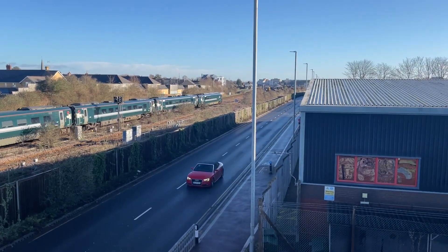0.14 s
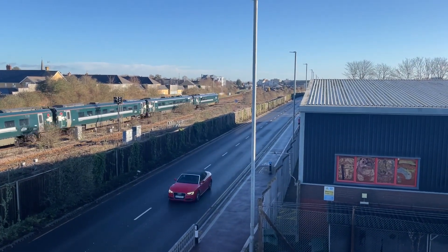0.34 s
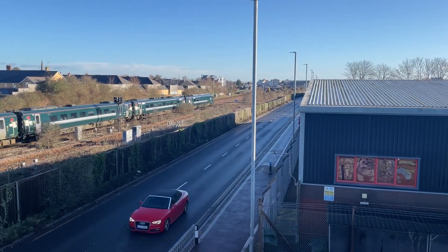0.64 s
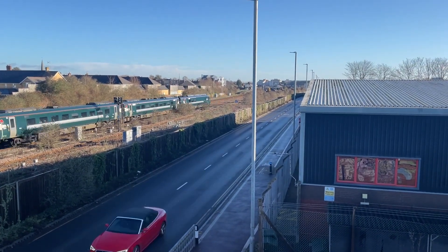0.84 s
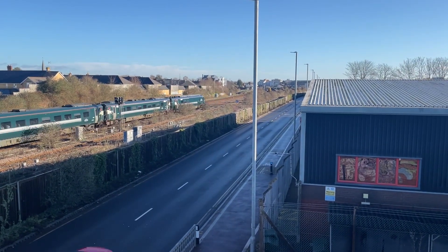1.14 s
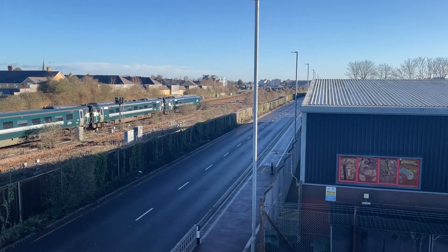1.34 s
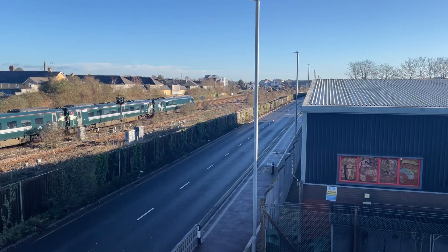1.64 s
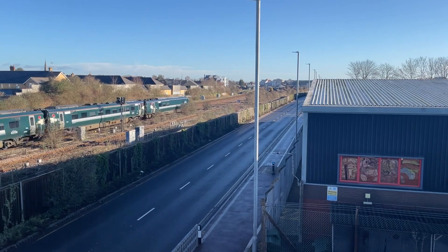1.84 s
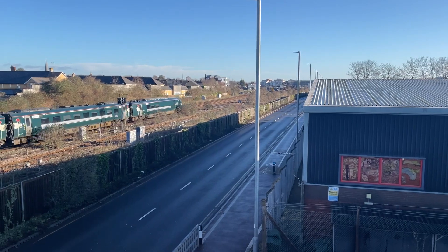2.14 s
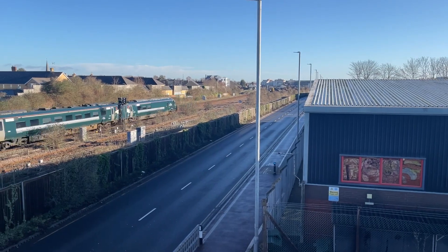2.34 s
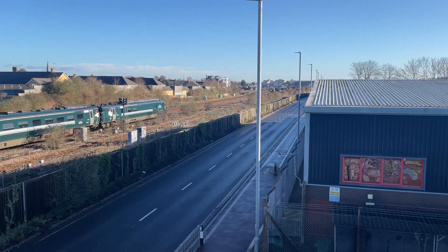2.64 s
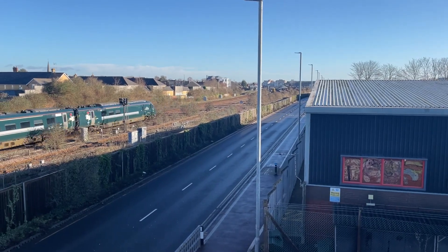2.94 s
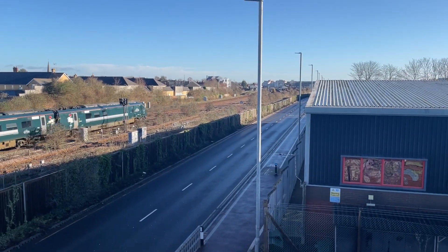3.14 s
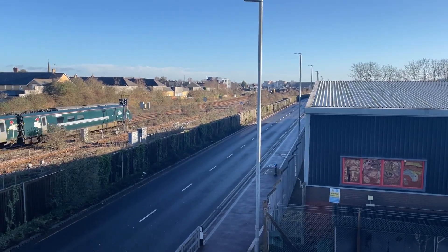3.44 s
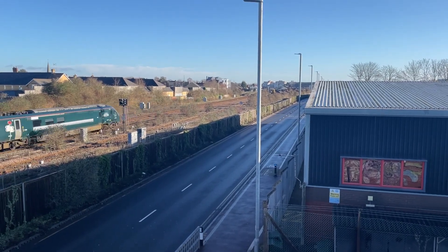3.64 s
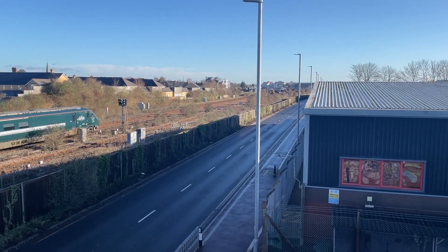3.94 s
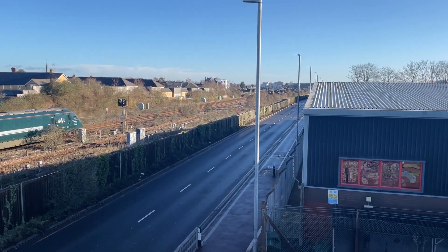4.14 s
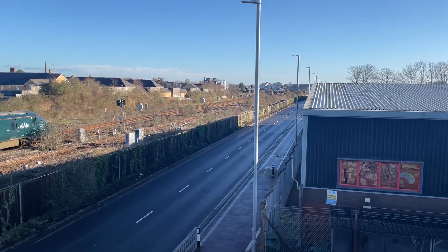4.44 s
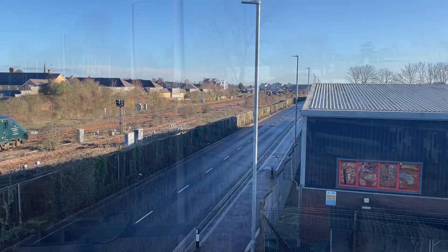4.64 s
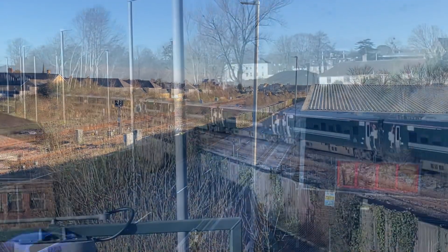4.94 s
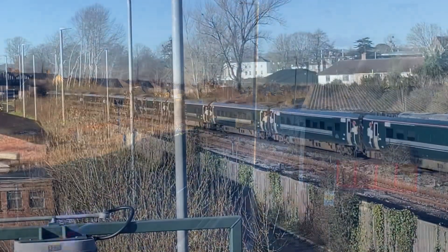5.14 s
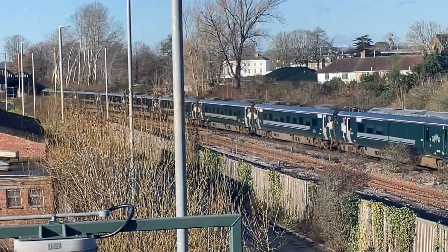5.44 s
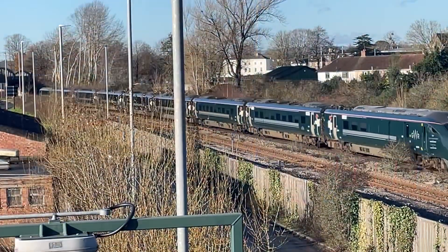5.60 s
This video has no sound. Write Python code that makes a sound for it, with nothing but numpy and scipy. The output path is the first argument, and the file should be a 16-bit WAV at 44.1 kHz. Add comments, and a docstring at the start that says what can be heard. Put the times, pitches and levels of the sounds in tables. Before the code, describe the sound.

Continuous low rumble and grainy rail roar from passing coaches, with dull knocks and clanks, droning diesels and thin airy hiss. Early on, a car's hollow tyre noise moves from ahead to the left and drops away. The train grows slightly brighter, a wheel rim sings briefly, then the open-air scene dissolves to a gentler train rumble with a deep engine boom on the right, picked up by small stereo microphones.

```python
"""Diesel train and passing car

A diesel passenger train rolls past on the left, and a car drives by on a road. Coloured noise makes its roar,
decaying thumps its wheel drops, and roughened tones its engine drone, gear whine and turbo hiss.
The car is tyre noise that moves from ahead to the left.
Near the end this place fades into a quieter one, with a second train on the right."""
import sys
import numpy as np
from scipy import signal
from scipy.fft import rfft, irfft
from scipy.io import wavfile

SR = 44100
rng = np.random.default_rng(int(sys.argv[2]) if len(sys.argv) > 2 else 0)


def dump(signal):
    """Clip the signal to [-1, 1] and save it as 16-bit WAV at the path in sys.argv[1]."""
    limited = np.clip(np.atleast_2d(signal).T, -1, 1)
    pcm = np.round(limited * 32767).astype(np.int16)
    wavfile.write(sys.argv[1], SR, pcm)


N = 254439
TIME = np.arange(N) / SR  # seconds
FREQ = np.maximum(np.arange(N // 2 + 1) * SR / N, 1)  # Hz


# Tone colour of the train's rolling noise: pitch_hz, relative_level_db
TRAIN_COLOUR = [(25, -22), (40, -8), (60, 5), (110, -2), (175, -4.5), (250, -8.5), (330, -6.5), (550, -5),
                (850, -8), (1200, -14), (2600, -18), (3200, -22.5), (4400, -30.5), (5400, -25), (6800, -27),
                (9000, -109), (12500, -42.5)]
# Bogies (wheel frames) on rough track, each a surge of rumble: peak_s, level_db, half_length_s
SURGES = [(0.087, -42, 0.13), (0.435, -32, 0.1), (1.18, -33.5, 0.081), (1.565, -34, 0.19),
          (2.59, -32.5, 0.12), (3.026, -31.5, 0.2), (4.057, -32.5, 0.13), (4.385, -31, 0.17)]
# The rails hiss more as the last bogies go by: peak_s, half_length_s, level_db (before the view opens up)
HISS_SWELLS = [(2.417, .09, -53), (2.92, 0.18, -55.5), (4.417, 0.11, -48)]
# Steady levels, before the changes over time below
GROUND_DB, BOOM_DB, ROAR_DB, RING_DB, HISS_DB = -36.5, -31, -29, -31.5, -46.5
SURGE_BOOM_DB, SURGE_ROAR_DB = 0, 1  # against the rumble of the same surge
# Roar, ring and hiss grow until the rear of the train is out in the open
OPEN_S, OPEN_DB_PER_S = 2.56, 1.0
# A short lull between the bogies of the last coach
LULL_S, LULL_HALF_S, LULL_DB = 3.52, 0.049, -1


def rolling():
    """Rough wheels on rough rails: the ground rumbles, bogies boom, wheels roar and ring, rails hiss."""
    colour = undb(spectra(TRAIN_COLOUR)[0])
    surge = together(undb(db) * swell(s, half_s) for s, db, half_s in SURGES)
    hiss_swells = [undb(db) * swell(s, half_s) for s, half_s, db in HISS_SWELLS]

    ground_gain = together([undb(GROUND_DB), surge])
    boom_gain = together([undb(BOOM_DB), undb(SURGE_BOOM_DB) * surge])
    roar_gain = together([undb(ROAR_DB), undb(SURGE_ROAR_DB) * surge])
    hiss_gain = together([undb(HISS_DB), *hiss_swells])

    ground = noise(colour * below(91) * above(29, order=1)) * ground_gain
    boom = restless(colour * above(115) * below(255), flicker_db=2.5, rate_hz=7.3) * boom_gain
    roar = restless(colour * above(256) * below(1420), flicker_db=0.9, rate_hz=18) * roar_gain
    ring = restless(colour * above(1356) * below(3700), flicker_db=0.6, rate_hz=16) * undb(RING_DB)
    hiss = restless(colour * above(3960), flicker_db=3.7, rate_hz=29) * hiss_gain

    in_view = undb(OPEN_DB_PER_S * np.minimum(TIME - OPEN_S, 0))
    lull = undb(LULL_DB * swell(LULL_S, LULL_HALF_S))
    return (ground + boom + (roar + ring + hiss) * in_view) * lull


# Wheels dropping over rail joints and points: start_s, relative_level_db, thump_pitch_hz,
# clank_against_thump_db, clank_top_hz, ring_s
THUMPS = [(0.022, -11.5, 131.7, -14, 970, .029), (0.422, -7.5, 199.4, -10, 603, .029),
          (0.535, -12, 65.7, -12, 960, 0.032), (1.058, -14.5, 110, -3, 965, 0.023),
          (1.299, -10.5, 117, 2.5, 1700, 0.027), (1.457, -11.5, 67, -10.5, 970, 0.046),
          (1.638, -14.5, 164, 3, 960, 0.019), (1.822, -11, 121, -16, 960, 0.023),
          (1.944, -22.5, 145, 8.5, 1470, 0.044), (2.284, -14.5, 224, 6, 1400, 0.028),
          (2.425, -15.5, 129, 2.5, 955, .029), (2.61, -8.5, 78, -8.5, 950, 0.031),
          (2.737, -13, 136, 3, 1400, .029), (3.1, -8, 96.5, -9, 975, .029),
          (3.184, -9.5, 168.4, -0.5, 970, 0.036), (3.3, -16, 206.5, 0, 960, 0.026),
          (3.652, -4.5, 229, -3.5, 1310, 0.014), (3.788, -11, 159, -6.5, 554, 0.018),
          (3.839, -7, 64.4, -16.5, 960, 0.026), (4.321, -13.5, 102.6, -9, 950, 0.038),
          (4.531, -9, 146, -3.5, 1600, 0.024)]


def thumps(rise_s=0.0036, thump_db=-10.0, rattle=0.91):
    """Each wheel drop rings the bogie at one pitch, rattles it and clanks in the rail."""
    out = np.zeros(N)
    rail = above(280)
    for s, db, hz, clank_db, top_hz, ring_s in THUMPS:
        age = np.maximum(TIME - s, 0)
        shake = noise(above(hz / 2, order=3) * below(hz * 1.4, order=3))
        boom = np.sin(2 * np.pi * hz * age) + rattle * shake
        clank = undb(clank_db) * noise(rail * below(top_hz))
        envelope = (1 - np.exp(-age / rise_s)) ** 2 * np.exp(-age / ring_s)
        out += undb(db + thump_db) * envelope * (boom + clank)
    return out


# Underfloor engines as the coaches go by: peak_s, half_length_s, firing_hz, firing_level_db, octave_level_db
ENGINE_SWELLS = [(0.26, 0.18, 87, -24.5, -47), (0.609, 0.32, 87.5, -31, -51.5),
                 (1.337, 0.13, 82, -27.5, -52), (1.703, 0.21, 88, -35, -34.5),
                 (2.164, 0.07, 89.23, -37.5, -34), (2.59, 0.22, 88, -42, -35), (3.26, 0.15, 89, -31, -40),
                 (4.017, 0.086, 87, -24, -48.5), (4.345, 0.13, 85, -27, -46.5),
                 (4.734, 0.16, 87, -29.5, -47)]
DRONE_DB = -34.5  # firing tone between the swells


def engines():
    """Diesels drone at the rate their cylinders fire; the pitch glides from one swell to the next."""
    _, hz, _, _ = curves(ENGINE_SWELLS)
    firing = together(undb(db) * swell(s, half_s) for s, half_s, _, db, _ in ENGINE_SWELLS)
    octave = together(undb(db) * swell(s, half_s) for s, half_s, _, _, db in ENGINE_SWELLS)
    drone = tone(hz, rough=0.5, width_hz=14) * together([undb(DRONE_DB), firing])
    return drone + tone(2 * hz, rough=0.97, width_hz=13) * octave


# Tones of passing engines and gears, some at multiples of the engine firing rate: peak_s, half_length_s,
# pitch_hz, level_db, roughness (0-1)
WHINES = [(0.055, 0.05, 863, -41, 0.9), (0.575, 0.15, 886, -38.5, 0.4), (1.003, 0.095, 894, -32, .15),
          (1.5, 0.23, 883, -35, .6), (2.123, 0.059, 881, -31.5, 0.4), (2.35, 0.32, 898, -37, .45),
          (3.726, 0.077, 881, -31.5, 1), (3.66, .02, 430, -30, 0.5), (3.92, .17, 441.5, -32, 0.4),
          (4.024, 0.1, 368, -33.5, 0.5), (4.25, 0.21, 527.6, -36, 0.2), (4.41, 0.1, 436, -36, .4),
          (4.24, 0.11, 927, -32, 0.3), (4.555, 0.12, 900, -40, .4)]
# Blurred whine of all the other axles: time_s, pitch_hz, level_db
WHINE_BED = [(0, 875, -39.5), (1.8, 883.5, -41.5), (2.3, 891, -40), (3.2, 896, -39), (3.9, 904, -39),
             (4.3, 933, -36), (4.8, 922, -35.5)]


def gears():
    """Gear whines and engine overtones swell and fade one by one, each at its own pitch, over the blur of the
    other axles."""
    near = np.zeros(N)
    for s, half_s, hz, db, rough in WHINES:
        near += tone(hz, rough, width_hz=18) * undb(db) * swell(s, half_s)
    bed_hz, bed_db = curves(WHINE_BED)
    return near + tone(bed_hz, rough=1.4, width_hz=40) * undb(bed_db)


# Turbochargers as the coaches go by: peak_s, half_length_s, level_db
TURBO_SWELLS = [(0.852, 0.17, -55.5), (1.902, 0.59, -59.5), (3.096, 0.25, -50.5), (3.67, 0.081, -51),
                (4.39, 0.24, -54)]
# Starting pitch, steady fall of the pitch, and level between the swells
TURBO_HZ, TURBO_SAG_HZ_PER_S, TURBO_DB = 10150, 71, -55


def turbos():
    """A tone scattered into an airy hiss high above the engines; its pitch sinks as the train passes."""
    swells = [undb(db) * swell(s, half_s) for s, half_s, db in TURBO_SWELLS]
    hiss = tone(TURBO_HZ - TURBO_SAG_HZ_PER_S * TIME, rough=9.6, width_hz=540)
    return hiss * together([undb(TURBO_DB), *swells])


# Single wheels that sing above the roar: peak_s, half_length_s, pitch_hz, level_db
WHEEL_SONGS = [(2.882, 0.098, 2540, -41), (3.31, 0.05, 2384, -36.5), (4.1, 0.15, 2587, -40.5),
               (4.56, 0.057, 1173, -35), (4.78, 0.17, 1850, -35)]


def wheel_songs():
    """A wheel's own resonance, rubbed into a rough, airy ring."""
    songs = [tone(hz, rough=6, width_hz=130) * undb(db) * swell(s, half_s)
             for s, half_s, hz, db in WHEEL_SONGS]
    return sum(songs)


def flange(s=4.54, length_s=0.087, hz=1000, db=-33):
    """A flange (wheel rim) of the last bogie rubs the rail and sings briefly."""
    return tone(hz, rough=2.5, width_hz=43) * undb(db) * np.exp(-((TIME - s) / length_s) ** 2)


GRIT_PER_S, GRIT_SCATTER_DB, GRIT_DB = 110, 3.5, -38.5  # ticks per second, spread of sizes, level


def grit(ring_s=0.0019):
    """Grit crushed between wheel and rail: small uneven ticks of noise roughen the roar."""
    sizes = undb(GRIT_SCATTER_DB * rng.standard_normal(N))
    ticks = (rng.random(N) < GRIT_PER_S / SR) * sizes
    envelope = signal.lfilter([1], [1, -np.exp(-1 / (ring_s * SR))], ticks)
    bursts = envelope * rng.standard_normal(N)
    wheel = undb(spectra(TRAIN_COLOUR)[0]) * above(1010) * below(2460)
    return unit(irfft(rfft(bursts) * wheel, N)) * undb(GRIT_DB)


CHATTER_PER_S, CHATTER_LOW_HZ, CHATTER_HIGH_HZ, CHATTER_RING_S = 220, 1000, 2300, .008
CHATTER_DB = -39.5  # level in the train


def chatter():
    """Rough spots set off a random scatter of short, uneven rings that make rolling noise clumpy; rms 1."""
    out = np.zeros(2 * N)  # spare room for rings that run past the end
    age = TIME[TIME < 6 * CHATTER_RING_S]
    ring = (1 - np.exp(-age / .002)) * np.exp(-age / CHATTER_RING_S)
    for when, pitch, size in rng.random((int(CHATTER_PER_S * TIME[-1]), 3)):
        hz = CHATTER_LOW_HZ * (CHATTER_HIGH_HZ / CHATTER_LOW_HZ) ** pitch
        start = int(when * N)
        out[start:start + len(age)] += size ** 2 * ring * np.sin(2 * np.pi * hz * age)
    return unit(out[:N])


# Howl of the car's tread grooves in short bursts: peak_s, half_length_s, pitch_hz, level_before_car_gain_db
TREAD = [(0.774, 0.057, 764, -5), (.85, 0.045, 730, -5), (1.05, 0.072, 815, -5.5),
         (1.206, 0.031, 787, -3.5), (1.343, 0.046, 815, -2.5), (1.54, 0.071, 788, -4.5),
         (1.727, 0.047, 780, -6.5)]
# Turning point of the car's level, the level its slopes meet at, and the slopes before and after
CAR_S, CAR_DB, CAR_RISE_DB_PER_S, CAR_FALL_DB_PER_S = 1.435, -22.5, 3, 16
CAR_TURN_S, CAR_TURN_HALF_S = 1.42, 0.33  # middle and pace of the move to the left


def car(close_db=-1.5, close_half_s=0.045):
    """Tyre noise grows slowly, dips briefly as the car goes by, moves from ahead to the left and dies fast."""
    rise_db = CAR_RISE_DB_PER_S * (TIME - CAR_S)
    fall_db = CAR_FALL_DB_PER_S * (CAR_S - TIME)
    level_db = CAR_DB + np.minimum(rise_db, fall_db) + close_db * swell(CAR_S, close_half_s)

    turn = np.pi / 2 * (1 + np.tanh((TIME - CAR_TURN_S) / CAR_TURN_HALF_S)) / 2
    howl = sum(tone(hz, rough=2, width_hz=36) * undb(db) * swell(s, half_s) for s, half_s, hz, db in TREAD)
    ahead = ports(tyres() * np.cos(turn), AHEAD)
    left = ports(tyres() * np.sin(turn) + howl, LEFT)
    return (ahead + left) * undb(level_db)


# Tone colour of the tyre roar: pitch_hz, relative_level_db
TYRE_COLOUR = [(120, -10.5), (300, -8), (500, -6.5), (790, -0.5), (1080, -7), (1650, -4), (2300, -11),
               (3100, -24.5), (4200, -46.5), (6500, -31.5), (9000, -81), (12500, -59)]
TREAD_BED_HZ, TREAD_BED_DB, TYRE_CHATTER_DB = 767, -12.5, -10  # levels against the tyre roar


def tyres():
    """Broad, clumpy road roar with a hollow band from the tread grooves."""
    roar = restless(undb(spectra(TYRE_COLOUR)[0]) * above(70), flicker_db=0.1, rate_hz=54)
    bed = undb(TREAD_BED_DB) * tone(TREAD_BED_HZ, rough=4, width_hz=96)
    return roar + bed + undb(TYRE_CHATTER_DB) * chatter()


# Tone colour of the second train's rolling noise: pitch_hz, relative_level_db
FAR_COLOUR = [(25, -13), (60, 0), (120, -2), (150, -5.5), (190, -12), (270, -7.5), (400, -5), (580, -11),
              (760, -6.5), (1200, -12.5), (1800, -13.5), (2800, -20.5), (4500, -33.5), (6700, -37.5),
              (8000, -72), (9500, -40), (12500, -54)]
# Engine booms, one after the other: multiple_of_shaft_rate, peak_s, half_length_s, level_db
FAR_ORDERS = [(2, 5.1, 0.33, -34), (3, 5.57, 0.27, -31.5)]
FAR_SHAFT_HZ, FAR_GEAR_HZ = 26.95, 368
# Levels of wheels and gear hum at FAR_S, and their slow change
FAR_S, FAR_WHEELS_DB, FAR_GEAR_DB, FAR_SLOPE_DB_PER_S = 5.27, -30, -45.5, -1


def second_train():
    """Soft rolling noise and a gear hum sink slowly, while the engine booms at multiples of its shaft rate."""
    colour = undb(spectra(FAR_COLOUR)[0]) * above(82, order=1)
    wheels = restless(colour, flicker_db=1.5, rate_hz=18) * undb(FAR_WHEELS_DB)
    hum = tone(FAR_GEAR_HZ, rough=1.2, width_hz=36) * undb(FAR_GEAR_DB)
    engine = np.zeros(N)
    for multiple, s, half_s, db in FAR_ORDERS:
        engine += tone(multiple * FAR_SHAFT_HZ, rough=.2, width_hz=4.5) * undb(db) * swell(s, half_s)
    return (wheels + hum) * undb(FAR_SLOPE_DB_PER_S * (TIME - FAR_S)) + engine


def undb(db):
    """Decibels to gain."""
    return 10 ** (np.asarray(db) / 20)


def unit(x):
    """Scale to rms 1 (rms is the average strength)."""
    return x / np.sqrt(np.mean(x ** 2))


def curves(table):
    """The columns of a table, joined by straight lines in time."""
    s, *columns = np.transpose(table)
    return [np.interp(TIME, s, c) for c in columns]


def spectra(table):
    """The columns of a table, joined by straight lines over log frequency."""
    hz, *columns = np.transpose(table)
    return [np.interp(np.log(FREQ), np.log(hz), c) for c in columns]


def swell(s, half_s):
    """Gain of a source that comes and goes: 1 at s, about 4 dB down half_s before and after."""
    return np.exp(-.5 * ((TIME - s) / half_s) ** 2)


def together(gains):
    """Gain of unrelated sources heard at once: their powers add."""
    return np.sqrt(sum(g ** 2 for g in gains))


def ramp(s, length_s):
    """A straight rise from 0 to 1 that starts at s."""
    return np.clip((TIME - s) / length_s, 0, 1)


def below(hz, order=4):
    """Gain of a low-pass, which keeps what lies below hz."""
    return 1 / np.sqrt(1 + (FREQ / hz) ** (2 * order))


def above(hz, order=4):
    """Gain of a high-pass, which keeps what lies above hz."""
    return 1 / np.sqrt(1 + (hz / FREQ) ** (2 * order))


def noise(gain):
    """Noise of rms 1 with the given gain at each frequency."""
    real, imaginary = rng.standard_normal((2, len(FREQ)))
    return unit(irfft((real + 1j * imaginary) * gain, N))


def walk(rate_hz):
    """Slow random wandering of rms 1."""
    return noise(below(rate_hz, order=2))


def restless(gain, flicker_db, rate_hz):
    """Coloured noise whose octaves each swell and sink on their own; rms 1."""
    spectrum = rfft(noise(gain))
    out = np.zeros(N)
    for octave in range(4, 15):  # centres from 16 Hz to 16 kHz
        band = np.maximum(1 - abs(np.log2(FREQ) - octave), 0)
        out += irfft(spectrum * band, N) * undb(flicker_db * walk(rate_hz))
    return unit(out)


def tone(hz, rough, width_hz):
    """A tone of rms 1, partly scattered into a narrow band around its pitch."""
    phase = 2 * np.pi * (np.cumsum(hz * np.ones(N)) / SR + rng.random())
    in_step = (1 + rough * walk(width_hz)) * np.sin(phase)
    out_of_step = rough * walk(width_hz) * np.cos(phase)
    return unit(in_step + out_of_step)


# How two sound openings (ports) hear each direction:
# pitch_hz, left_minus_right_db, direct_share (0-1), left_lead_rad
LEFT = [(81, 2.5, 0.92, -0.41), (282, 1.5, 0.94, 0.62), (532, 1.5, 0.97, 1.57), (714, 6.5, 0.85, 1.01),
        (1210, 0.5, 0.77, 1.23), (1800, -3, 0.49, 2.17), (2460, -8, 0.64, 0.67), (3120, -3.5, 0.8, 0.62),
        (3430, 1, 1, 2), (4240, 2.5, 0.98, 1.6), (6070, -3.5, 0.36, -4)]
AHEAD = [(300, 3, 0.95, -0.65), (517, -3, 0.92, 1.9), (780, 1.5, 0.79, -1.4), (1060, -1.5, 0.92, 1.3),
         (2140, -2, 1, -0.5), (2650, -7.5, 0.53, -1.2), (3880, -23, 0.44, 3), (5040, -3, 0.2, 1)]
RIGHT = [(79.5, 1.5, 1, 0.09), (200.3, 3, 0.83, 0.084), (400, 0, 1, -0.88), (690, -3, 0.89, -1.34),
         (1320, -1, 0.86, -1.15), (1970, 1, 0.78, 0.96), (2800, 1.5, 0.92, -0.62), (4220, 0, 0.96, 0.079),
         (6000, 0, 1, -1.4)]
# In the treble the lag reaches half a cycle and beyond, from any direction (same columns)
TREBLE = [(7200, 0, .92, -np.pi), (8700, 0, .92, -np.pi), (10400, 0, .75, -.4), (12200, 0, .7, 0),
          (13200, 0, .7, np.pi)]


def ports(x, direction, scatter_s=0.03):
    """Direct sound reaches the two ports with a lag; reflections from around reach each differently."""
    balance_db, direct, lead = spectra(list(direction) + list(TREBLE))
    direct = np.clip(direct, 0, 1)
    side = np.array([[.5], [-.5]])  # left, right
    walls = rfft(rng.standard_normal((2, N)) * np.exp(-TIME / scatter_s) * TIME)
    straight = np.sqrt(direct) * np.exp(1j * side * lead)
    reflected = np.sqrt(1 - direct) * walls / abs(walls)  # random timing, even strength
    return irfft(rfft(x) * (straight + reflected) * undb(side * balance_db), N)


# Start of the dissolve, and how long the first place takes to go and the second to come
DISSOLVE_S, FADE_OUT_S, FADE_IN_S = 4.583, 1.0, 0.38


def scene():
    """The train on the left and the car fade into the second train on the right."""
    wheels = rolling() + grit() + undb(CHATTER_DB) * chatter() + wheel_songs() + thumps() + flange()
    train = wheels + engines() + gears() + turbos()
    fading = (1 - ramp(DISSOLVE_S, FADE_OUT_S)) ** 2
    first_place = ports(train * fading, LEFT) + car() * fading
    return first_place + ports(second_train(), RIGHT) * ramp(DISSOLVE_S, FADE_IN_S)


def record(dry):
    """Fade both ends over 4 ms and steeply cut everything above 13.3 kHz."""
    fade = np.clip(np.minimum(TIME, TIME[-1] - TIME) / .004, 0, 1)
    top_cut = signal.ellip(8, .2, 70, 13300, fs=SR, output="sos")
    return signal.sosfilt(top_cut, dry * fade)


dry = scene()
out = record(dry)
dump(out)
```